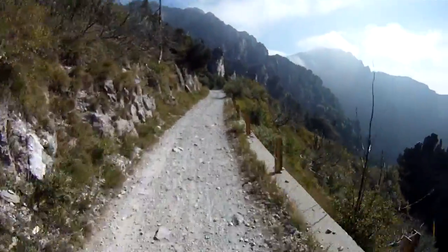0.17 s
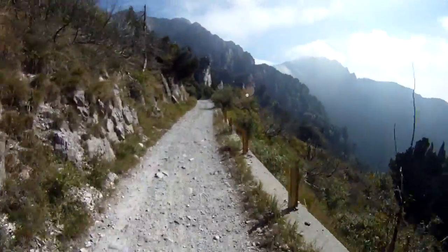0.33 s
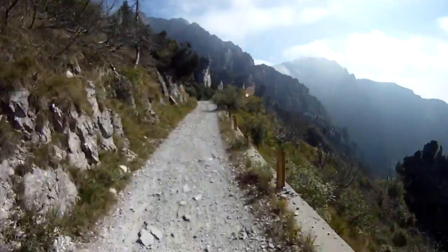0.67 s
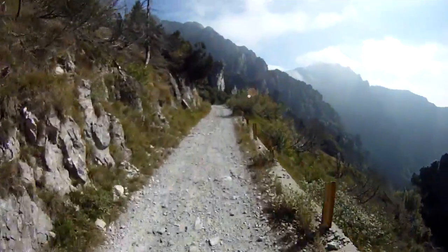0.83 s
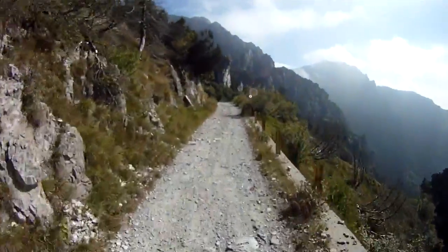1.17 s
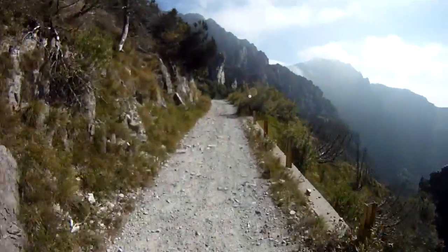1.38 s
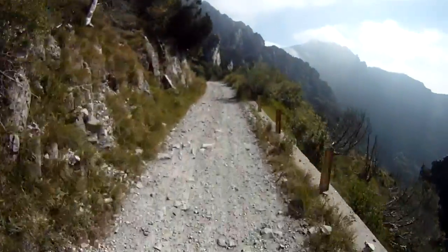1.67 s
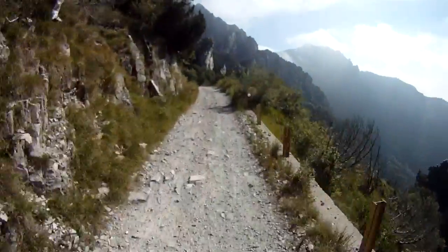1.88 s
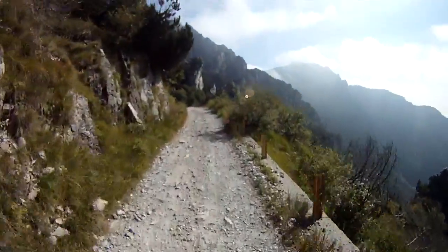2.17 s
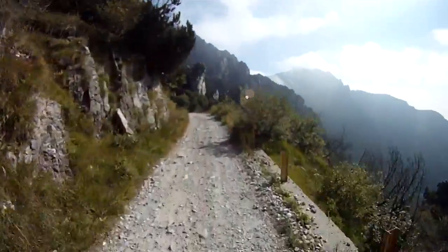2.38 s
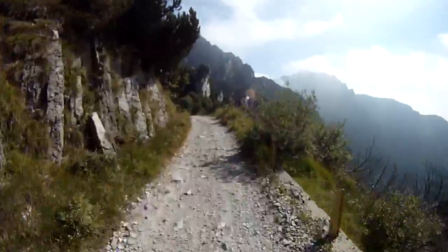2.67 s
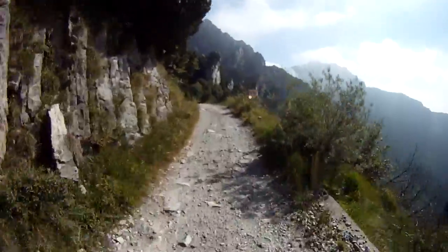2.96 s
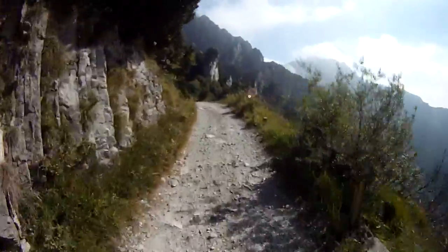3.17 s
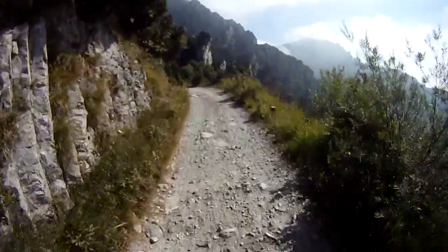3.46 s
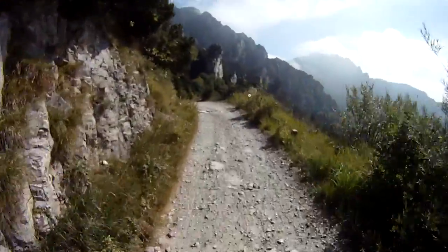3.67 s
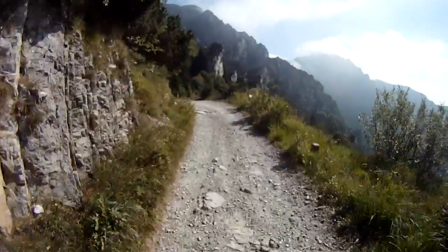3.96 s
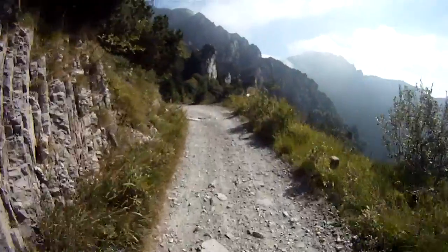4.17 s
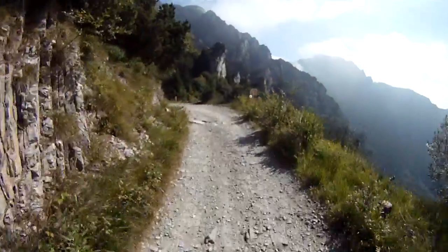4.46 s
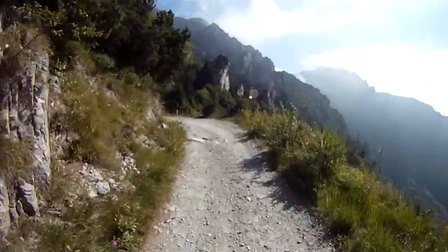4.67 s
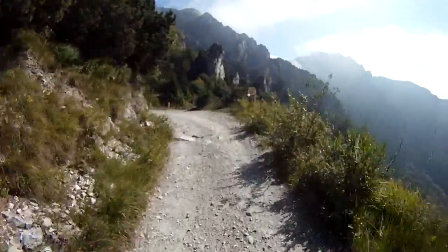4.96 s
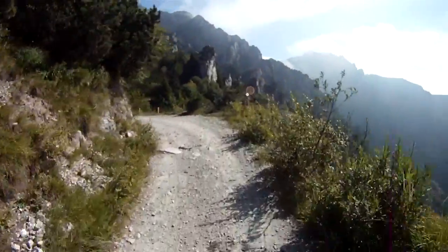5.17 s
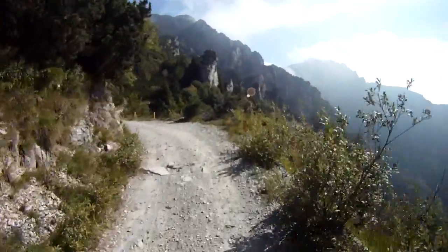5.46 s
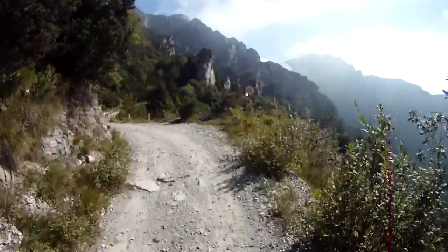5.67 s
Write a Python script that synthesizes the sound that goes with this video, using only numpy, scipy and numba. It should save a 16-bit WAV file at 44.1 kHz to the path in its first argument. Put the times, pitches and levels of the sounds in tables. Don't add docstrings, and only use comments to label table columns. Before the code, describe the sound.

A motorcycle with a slow single-cylinder engine putters along a rough mountain gravel track. Separate dull thuds, about twenty per second, slow to around thirteen, while stones patter densely under the tyres. Bumps rumble, pebbles knock hollowly on the mudguard, some crunch or ping. Outdoors and dry, picked up very close by a mounted camera in a plastic case, boxy with gritty, metallic treble.

```python
import sys
import numpy as np
from scipy import signal
from scipy.fft import rfft, irfft
from scipy.io import wavfile
from scipy.ndimage import uniform_filter1d
from numba import njit

SR = 44100
rng = np.random.default_rng(int(sys.argv[2]) if len(sys.argv) > 2 else 0)


def file_out(sig):
    cols = np.atleast_2d(sig).T
    lim = np.clip(cols, -1, 1)
    pcm = np.round(lim * 32767).astype(np.int16)
    wavfile.write(sys.argv[1], SR, pcm)


def how_loud(loudness_db):
    steps = np.asarray(loudness_db, float) / 20
    return 10 ** steps


N = 257103
T = np.arange(N) / SR

# time_s, firings_per_s
REVS = [(0.0, 19.2), (0.48, 20.24), (0.87, 20.14), (1.17, 18.9), (1.49, 18.42), (1.81, 18.79), (2.3, 18.99),
        (2.69, 18.85), (2.97, 16.48), (3.36, 16.43), (4.04, 14.35), (4.32, 14.4), (4.58, 13.9),
        (5.03, 14.51), (5.58, 12.27), (5.83, 14.36)]
# pitch_hz, width_hz, level_db
CASE_HIGH = [(2005, 260, 1), (2341, 208, 5), (2910, 110, -10.5), (3568, 333, -2.5), (4230, 110, -55),
             (4900, 360, -17)]


def engine():
    # pitch_hz at 20 firings per s, pitch_hz at 13, width_hz, delay_s, level_db
    silencer_rings = [(223, 201, 47, -.0085, 1), (420, 410, 57, -.008, -16.5), (300, 285, 50, -.004, -19),
                      (577, 536, 34, -.004, -27), (400, 440, 320, -.006, -15)]
    frame_ring = (99, 95, 27, .007, -2.5)
    first_phase = .29
    (rate,) = curves(REVS)
    peak_db = throttle()
    count = first_phase + np.cumsum(rate) / SR
    firings = np.flatnonzero(np.diff(np.floor(count)))
    chance = rng.standard_normal((200, 2))
    timing, force = chance[:len(firings)].T
    warmth = uniform_filter1d((rate - 13) / 7, SR // 2)
    out = 0
    for fast_hz, slow_hz, width_hz, delay_s, level_db in (*silencer_rings, frame_ring):
        pulses = np.zeros(N)
        when = firings + ((delay_s + 0.00075 * timing) * SR).astype(int)
        pulses[np.clip(when, 0, N - 1)] = how_loud(peak_db[firings] + level_db + 0.54 * force)
        hz = slow_hz + (fast_hz - slow_hz) * warmth
        peak_gain = np.e * SR / (2 * np.pi * width_hz)
        out = out + ring(pulses, hz, width_hz) * peak_gain
    return out, count % 1


def throttle():
    # time_s, drop_db, length_s
    stumbles = [
        (0.764, -13, 0.031),
        (1.24, -12, 0.1),
        (1.508, -9, 0.035),
        (1.94, -3, 0.064),
        (2.688, -7, 0.044),
        (2.913, -10.5, 0.08),
        (3.123, -6, 0.049),
        (3.216, -17, 0.036),
        (3.964, -7.5, 0.056),
    ]
    loaded_db, shut_s, shut_takes_s, shut_drop_db = -41, 5.2, 0.16, -6
    stumble_db = sum(db * np.exp(-((T - s) / length) ** 2) for s, db, length in stumbles)
    shut = np.clip((T - shut_s) / shut_takes_s + .5, 0, 1)
    return loaded_db + stumble_db + shut_drop_db * shut


def bumps(phase):
    # time_s, peak_db
    ruts = [(0.1, -30), (0.27, -30.9), (0.48, -31.5), (0.9, -31), (1.07, -28), (1.28, -41), (1.48, -27.5),
            (1.68, -33), (1.86, -32), (2.15, -32.0), (2.49, -26), (2.62, -35.5), (2.69, -41), (2.76, -31),
            (2.83, -32), (2.9, -33), (3.01, -41), (3.17, -37.5), (3.34, -36), (3.51, -36), (3.65, -36),
            (3.76, -29.5), (3.95, -29.7), (4.06, -35.5), (4.15, -29.5), (4.49, -35), (4.64, -33),
            (4.83, -38), (4.91, -30.5), (5.12, -35)]
    # time_s, peak_db
    jolts = [(0.08, -33), (0.21, -32), (0.36, -37), (0.57, -37.5), (0.74, -38), (0.9, -38.5), (1.13, -35.5),
             (1.49, -32.5), (1.57, -38.5), (1.66, -35.5), (1.76, -38.9), (1.86, -36.5), (2.08, -41.5),
             (2.18, -34.5), (2.28, -38), (2.4, -36), (2.5, -45), (2.77, -37.5), (2.89, -34.5), (3.03, -42),
             (3.18, -34.5), (3.44, -42), (3.82, -42), (4.2, -40.5), (4.35, -47), (4.42, -45), (4.71, -43),
             (4.92, -36.5), (5.05, -39), (5.13, -44)]
    bounce_db = swells(ruts, rise=0.027, fall=0.026, rest_db=-39)
    hum_db = swells(jolts, rise=0.026, fall=0.023, rest_db=-46.5)
    throb_db = 3 * np.cos(2 * np.pi * (phase - .33))
    road = rng.standard_normal((3, N))
    bounce = unit(ring(road[0], 22.9, 18.7)) + how_loud(-16.5) * unit(ring(road[1], 63.0, 40.0))
    hum = ring(ring(road[2], 97.2, 34.0), 97.6, 16.8)
    bounce = how_loud(bounce_db - 2.0) * steady(bounce, 0.102)
    return bounce + how_loud(hum_db - 3.5 + throb_db) * steady(hum, 0.044)


def gravel(phase):
    # time_s, patter_db
    looseness = [(0.0, -48.5), (0.53, -47.5), (1.75, -49.5), (2.16, -50), (2.37, -47.5), (2.95, -51.5),
                 (3.16, -51.5), (3.54, -52), (3.77, -53.5), (4.06, -51), (4.45, -52.5), (4.92, -51),
                 (5.1, -54.5), (5.83, -56.5)]
    # pitch_hz, width_hz, level_db
    case_low = [(918, 123, -3.5), (1120, 143, -2.5)]
    (loose_db,), (revs,) = curves(looseness), curves(REVS)
    hollow_db = -6.5 - .5 * (revs - 19) + 0.52 * walk(12)
    throb_db = 0.52 * np.cos(2 * np.pi * (phase - .15))
    shared_db = loose_db + 3.0 + throb_db + 1.54 * walk(30)
    stones = 0.59 * grains(2500, 4.3)
    bright = patter(CASE_HIGH, 900, 1.0, stones) * how_loud(-2.0 + 0.5 * walk(60))
    hollow = patter(case_low, 700, 1.6, stones) * how_loud(hollow_db - 1.0)
    return how_loud(shared_db) * (bright + hollow + mudguard_hum(revs) + tyre_roar())


def patter(modes, rate, spread_db, common):
    out = 0
    for hz, width_hz, level_db in modes:
        level = how_loud(level_db + 0.36 * walk(9))
        hits = common + grains(rate, spread_db)
        out = out + level * ring(hits, hz * (1 + 0.0059 * walk(20)), width_hz)
    return unit(out)


def mudguard_hum(revs):
    meet_revs, span_revs = 15.7, 1.15
    on_db, off_db = -3.5, -18
    match = np.exp(-((revs - meet_revs) / span_revs) ** 4)
    hum_db = off_db + (on_db - off_db) * match + 2.5 * walk(12)
    hz = 570.0 + 10.0 * np.clip(revs - meet_revs, -2, 1)
    return steady(ring(rng.standard_normal(N), hz, 40.0), 0.095) * how_loud(hum_db - 7)


def tyre_roar():
    # pitch_hz, level_db
    roar_colour = [(60, 13), (140, 8), (220, 6.5), (330, 0.5), (700, 0), (1450, 0), (1720, -2.5),
                   (1950, 1.5), (2700, -1), (3900, -8.5), (4600, -11.5), (5350, -13), (5750, -25)]
    hz, db = np.transpose(roar_colour)
    bins = np.log(np.fft.rfftfreq(N, 1 / SR) + 1)
    colour = how_loud(np.interp(bins, np.log(hz), db, left=-60, right=-60))
    return unit(irfft(rfft(grains(6000, 1.36)) * colour, N)) * how_loud(-54 + 52)


def crunches():
    # time_s, peak_db, length_s, brightness_db
    crushed_stones = [(0.754, -33, 0.015, -1), (1.419, -40, 0.015, 11), (1.445, -29, 0.02, 10.5),
                      (1.47, -33, 0.026, 5), (1.54, -35, 0.023, -2), (2.742, -44.5, 0.027, 11),
                      (2.937, -47, 0.011, 12), (3.116, -45.5, 0.022, 11.5), (3.253, -44, 0.017, 9.5),
                      (3.673, -48, 0.024, 13.5), (3.834, -44.5, 0.03, 6.5), (4.083, -33, 0.0095, 3.5),
                      (4.196, -34, 0.01, 3.5), (4.238, -43, 0.02, 6), (4.388, -34, 0.015, -4),
                      (4.87, -40, 0.021, 4), (4.892, -33.5, 0.021, 10.5), (4.952, -44, 0.035, 8.5),
                      (5.289, -38.5, 0.018, 7), (5.31, -38, 0.017, -1), (5.438, -39, 0.035, -2)]
    crack_s = .0015
    dull, sharp = np.zeros(N), np.zeros(N)
    for s, peak_db, length_s, bright_db in crushed_stones:
        attack = np.clip((T - s) / crack_s, 0, 1)
        burst = how_loud(peak_db) * attack / (1 + (np.abs(T - s) / length_s) ** 6)
        dull += burst
        sharp += burst * how_loud(bright_db)
    cracks = steady(grains(5000, 0.43), 0.003)
    low = body(dull * cracks, CASE_HIGH[:2])
    high = body(sharp * cracks, CASE_HIGH[2:])
    air = how_loud(-14.5) * ring(sharp * cracks, 2340.0, 5000.0)
    return how_loud(4) * (low + high + air)


def knocks():
    # time_s, peak_db, pitch_hz
    mudguard_hits = [(0.175, -38, 970), (0.832, -42, 1120), (0.875, -36, 1110), (1.205, -31.5, 1120),
                     (1.678, -34, 1120), (2.059, -33, 1110), (2.524, -29, 1080), (2.558, -31, 915),
                     (2.742, -30, 1030), (2.751, -20, 970), (3.07, -25, 914), (3.403, -29, 1030),
                     (3.758, -18.5, 1000), (3.826, -28, 980), (3.952, -27, 1040), (4.092, -34, 1030),
                     (4.258, -31, 910), (4.944, -31.5, 980), (5.295, -32.5, 980), (5.308, -36, 1040),
                     (5.453, -34.5, 930)]
    # time_s, peak_db, pitch_hz, t60_s
    metal_pings = [(1.423, -27, 3420, 0.025), (1.448, -35, 3560, .09), (1.449, -27, 2470, 0.049),
                   (1.451, -28.5, 4900, 0.035), (1.452, -33, 4230, 0.052), (1.455, -32.5, 1845, 0.093),
                   (3.953, -37, 1950, 0.03), (4.086, -33, 3450, 0.026), (4.159, -43, 3400, 0.023),
                   (4.197, -31, 1900, 0.04), (4.408, -38, 730, 0.018), (4.891, -35, 2390, .03),
                   (4.903, -33, 3610, 0.055), (4.904, -34, 2490, .04), (4.942, -34, 2350, 0.05),
                   (5.292, -38, 3620, 0.066), (5.322, -36, 2300, 0.037), (5.435, -41, 3540, 0.037)]
    hollow = tocks([(*row, .012) for row in mudguard_hits], rise=0.0015)
    return how_loud(8) * hollow + tocks(metal_pings, rise=0.00054)


def tocks(table, rise):
    out, t = np.zeros(N + SR), T[:SR // 8]
    for s, peak_db, hz, t60 in table:
        i = int(s * SR)
        contact = (1 - np.exp(-t / rise)) ** 2
        out[i:i + len(t)] += how_loud(peak_db - 60 * t / t60) * contact * np.sin(2 * np.pi * hz * t)
    return out[:N]


def rattles():
    # time_s, peak_db
    case_ticks = [(0.4284, -49), (0.437, -50), (0.512, -51), (0.8904, -45), (0.9147, -46), (1.0326, -47),
                  (1.0625, -44), (1.1129, -50), (1.1273, -47), (1.2231, -56), (1.508, -51), (2.1, -48),
                  (2.154, -52), (2.2653, -52), (2.1944, -48.5), (2.3326, -50), (2.4155, -44), (2.4294, -49),
                  (2.6434, -50), (2.66, -49), (2.694, -45), (2.9387, -49), (4.1589, -53), (4.6563, -52),
                  (4.683, -45), (4.7182, -44), (4.894, -50), (5.2934, -46), (5.375, -47), (5.6108, -46)]
    fade_s, tick_s, spread_db = .009, .0012, 2.5
    ticks = np.zeros(N)
    chance = rng.standard_normal((len(case_ticks), 10, 2))
    for (s, peak_db), (gaps, sizes) in zip(case_ticks, chance.transpose(0, 2, 1)):
        after = np.cumsum(0.0034 * np.exp(0.38 * gaps) * (np.arange(len(gaps)) > 0))
        fade_db = -13 * after / fade_s + spread_db * sizes * (after > 0)
        ticks[np.minimum(((s + after) * SR).astype(int), N - 1)] += how_loud(peak_db + fade_db)
    ticks += how_loud(-64 + 2.6 * rng.standard_normal(N)) * (rng.random(N) < 50 / SR)
    scrape = signal.lfilter([1], [1, -np.exp(-1 / (tick_s * SR))], ticks)
    grit = scrape * rng.standard_normal(N) / np.sqrt(tick_s * SR / 2)
    return how_loud(27) * ring(grit, 2700.0, 9700.0) + how_loud(32) * body(grit, CASE_HIGH[2:])


@njit
def svf(x, hz, width):
    y, b, l = np.empty(len(x)), 0., 0.
    for i in range(len(x)):
        g, k = np.tan(np.pi * hz[i] / SR), width / hz[i]
        v = (b + g * (x[i] - l)) / (1 + g * (g + k))
        b, l, y[i] = 2 * v - b, l + 2 * g * v, k * v
    return y


def ring(x, hz, width):
    hz = hz + np.zeros(N)
    return svf(svf(x, hz, 1. * width), hz, 1. * width)


def body(x, modes):
    return sum((-1) ** k * how_loud(db) * ring(x, hz, width) for k, (hz, width, db) in enumerate(modes))


def unit(x):
    return x / np.sqrt(np.mean(x ** 2))


def steady(x, seconds):
    return x / np.sqrt(uniform_filter1d(x ** 2, int(seconds * SR)) + 0.028 * np.mean(x ** 2))


def curves(table):
    s, *columns = np.transpose(table)
    return [np.interp(T, s, c) for c in columns]


def swells(table, rise, fall, rest_db):
    power = how_loud(2 * rest_db)
    for s, peak_db in table:
        power = power + how_loud(2 * peak_db) * np.exp(-((T - s) / np.where(T < s, rise, fall)) ** 2)
    return 10 * np.log10(power)


def walk(rate):
    k = int(SR / rate)
    held = np.repeat(rng.standard_normal(N // k + 1), k)
    return 1.05 * uniform_filter1d(uniform_filter1d(held, k), k)[:N]


def grains(rate, spread_db):
    hit = rng.random(N) < rate / SR
    size_db = spread_db * np.minimum(rng.exponential(size=N), 4.5)
    return unit(hit * rng.standard_normal(N) * how_loud(size_db))


def scene():
    thuds, phase = engine()
    return (thuds + bumps(phase) + gravel(phase) + crunches() + knocks() + rattles())[None]


def low_pass(x):
    return signal.sosfilt(signal.butter(12, 14980, fs=SR, output="sos"), x)


def record(dry):
    hold_hz, top_hz = 11508.58, 14790
    hz = np.fft.rfftfreq(N, 1 / SR) + 1e-9
    dulled = rfft(dry) / np.sqrt(1 + (hz / 5950) ** 24)
    sampled = dulled + rfft(how_loud(-73) * rng.standard_normal(N))
    narrow = irfft(sampled * (hz < hold_hz / 2), N)
    mirrored = narrow * (1 + 2 * np.cos(2 * np.pi * hold_hz * T))
    turn = np.pi * hz / hold_hz
    hold = np.sin(turn) / (4 * np.sin(turn / 4))
    mix = irfft(rfft(mirrored) * hold * (hz < top_hz), N)
    return low_pass(mix)


dry = scene()
out = record(dry)
file_out(out)
```